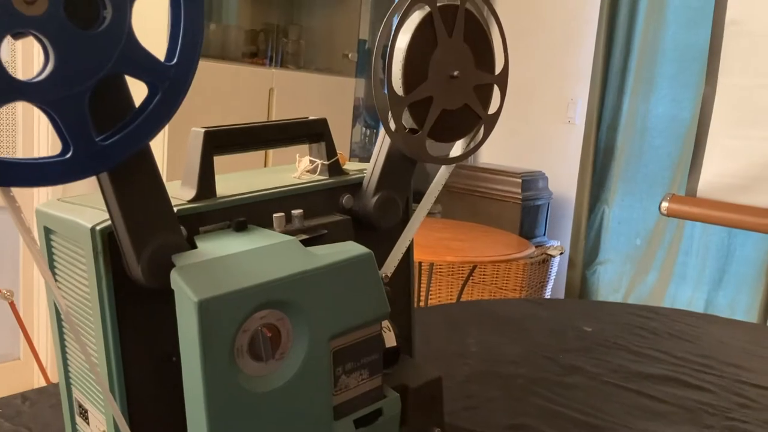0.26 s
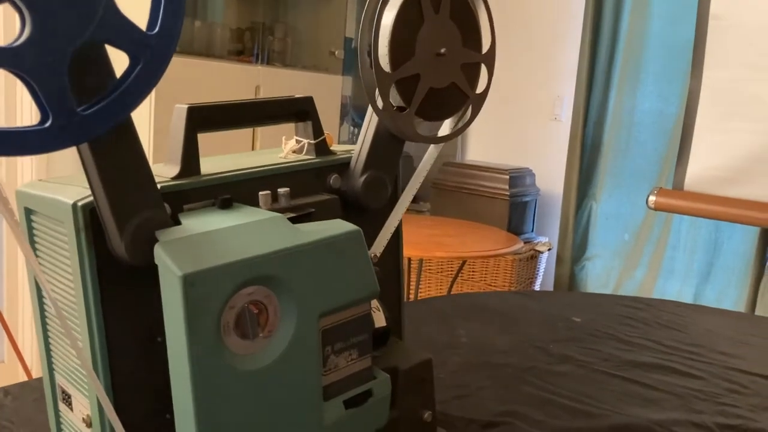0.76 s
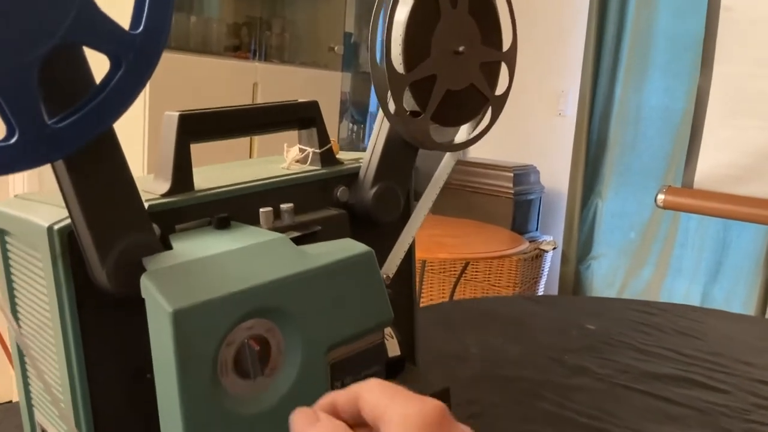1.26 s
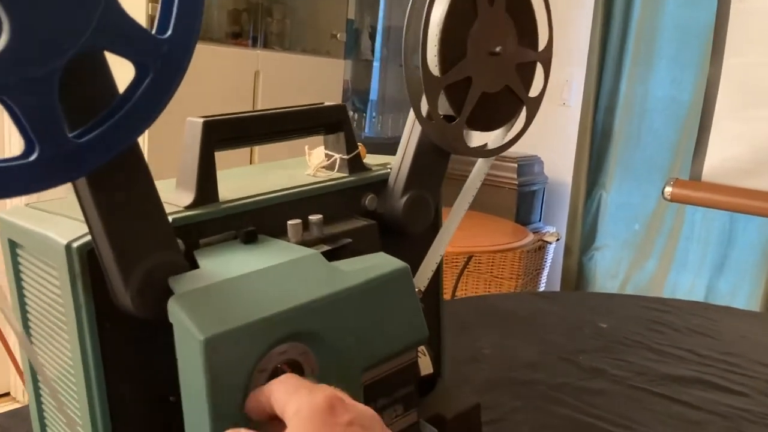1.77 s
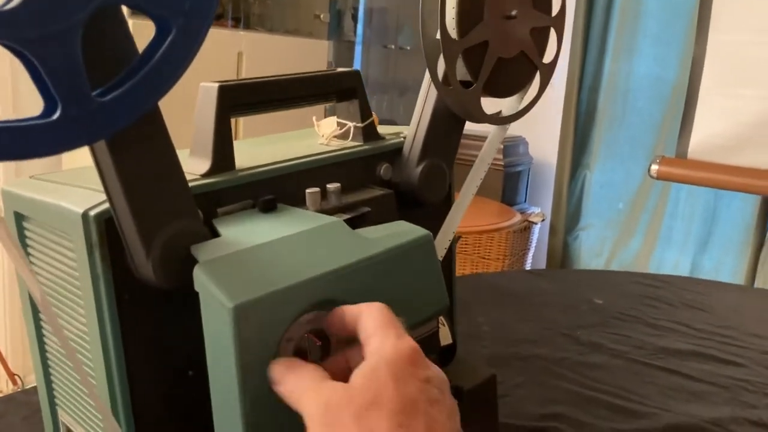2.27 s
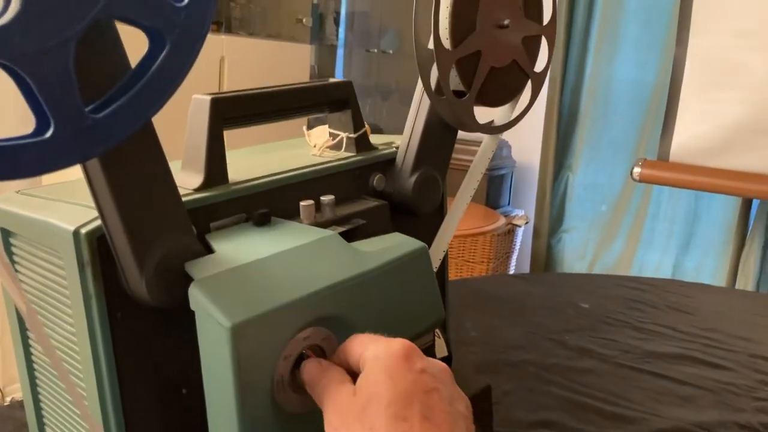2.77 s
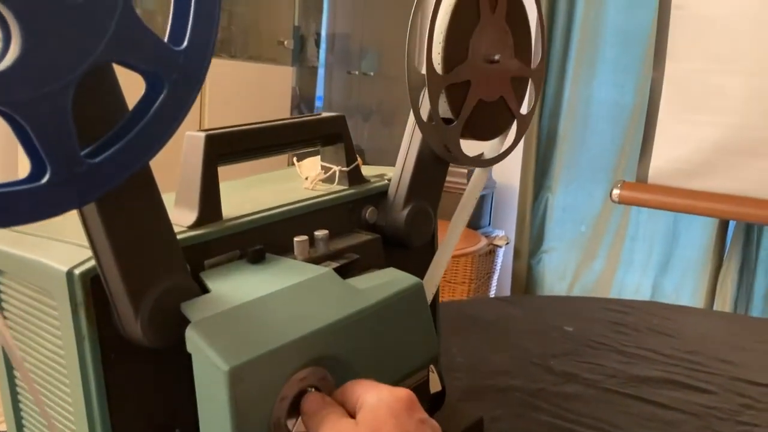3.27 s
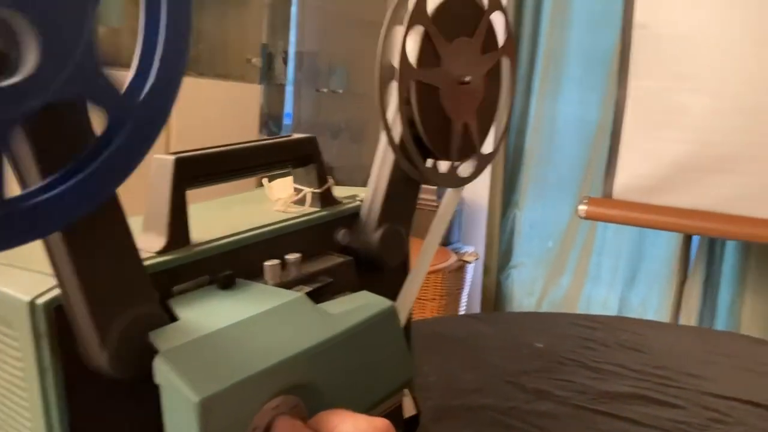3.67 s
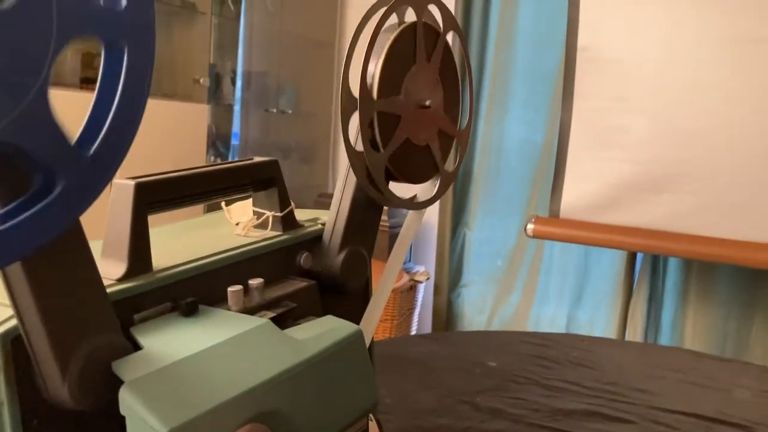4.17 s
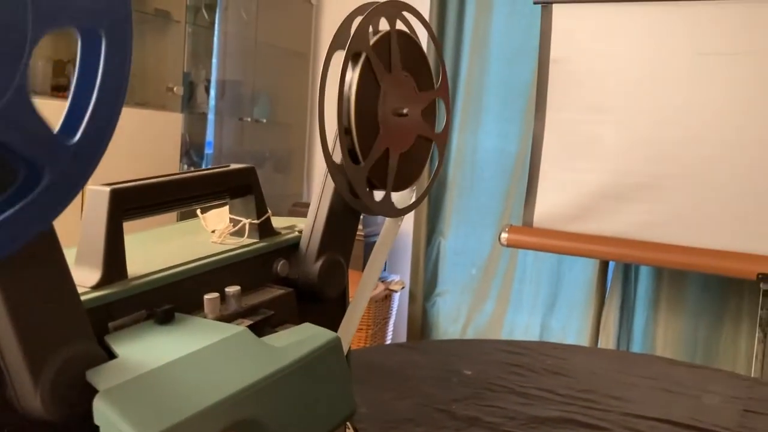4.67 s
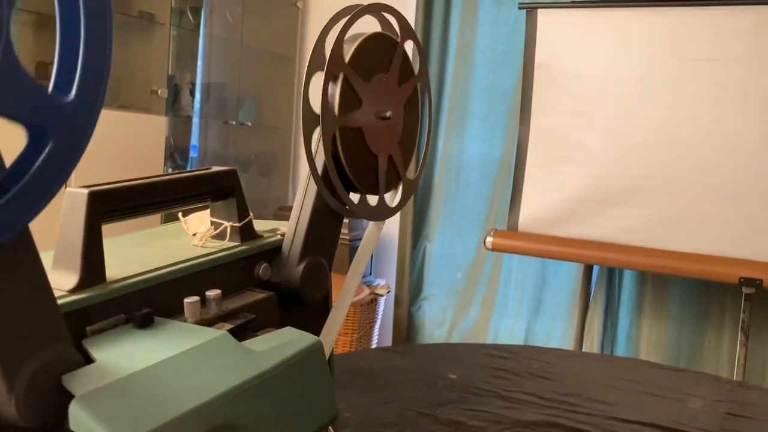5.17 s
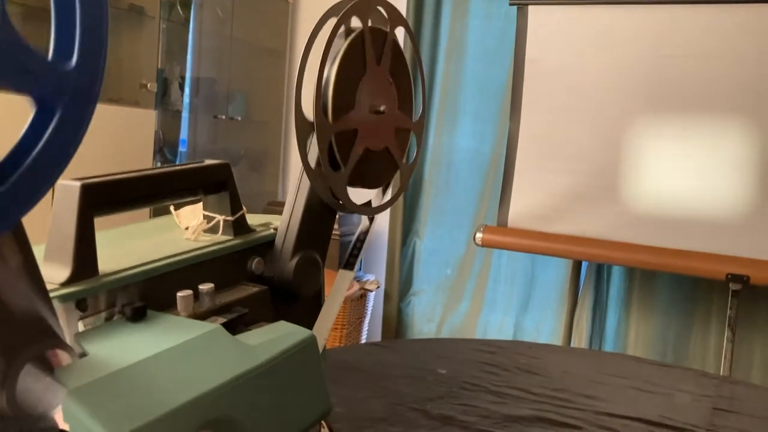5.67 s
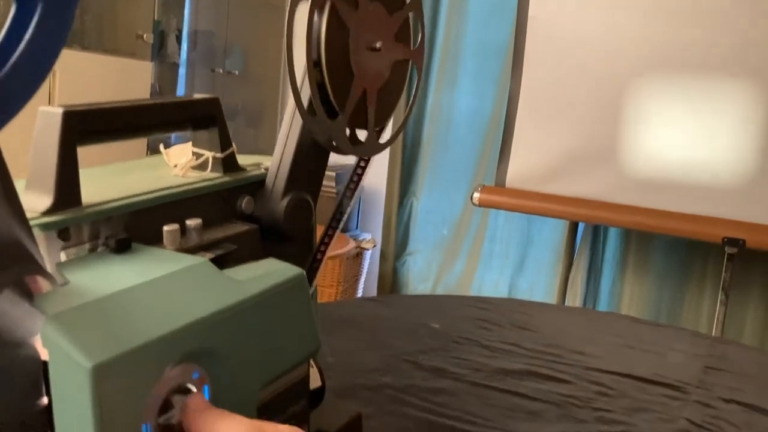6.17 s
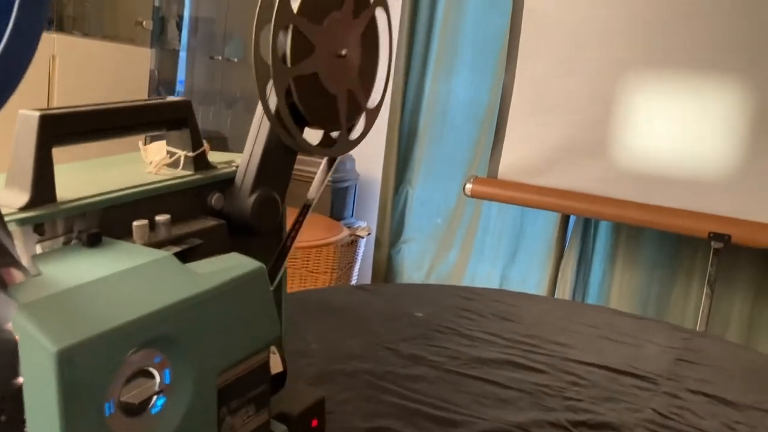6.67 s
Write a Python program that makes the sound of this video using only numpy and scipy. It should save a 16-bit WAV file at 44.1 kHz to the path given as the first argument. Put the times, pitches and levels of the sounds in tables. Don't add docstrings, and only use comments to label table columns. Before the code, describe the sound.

Soft fumbling and finger rubs on a dial, a hard clunk, a brief rising motor whine, then humming, clattering film projector with ticking film.

```python
import sys
import numpy as np
from scipy import signal
from scipy.fft import rfft, irfft, next_fast_len
from scipy.io import wavfile
from scipy.ndimage import map_coordinates

SR = 44100
rng = np.random.default_rng(int(sys.argv[2]) if len(sys.argv) > 2 else 0)


def gain_from_db(level_db):
    decades = np.asarray(level_db, float) / 20
    return 10 ** decades


def materialize(psi):
    bounded = np.clip(np.atleast_2d(psi).T, -1, 1)
    quanta = np.round(bounded * 32767).astype(np.int16)
    wavfile.write(sys.argv[1], SR, quanta)


N = 305607
T = np.arange(N) / SR
ON_S, SHUTTER_S = 3.08, 3.39
FRAMES = 89
FRAME_HZ = 23.4855


def unit(x):
    return x / np.sqrt(np.mean(x ** 2) + 1e-20)


def along(points, hz):
    f, v = np.transpose(points)
    return np.interp(np.log(hz + 1), np.log(f + 1), v)


def wobble(rate):
    coarse = T[::32]
    knots = rng.standard_normal(int(N * rate / SR) + 4)
    return np.interp(T, coarse, map_coordinates(knots, [coarse * rate]))


def filtered(x, response):
    m = next_fast_len(x.shape[-1] + 8192)
    spectrum = rfft(x, m) * response(np.fft.rfftfreq(m, 1 / SR))
    return irfft(spectrum, m)[..., :x.shape[-1]]


def ringing(x, modes):
    def response(f):
        total = 0
        for k, (c, w, db) in enumerate(modes):
            total = total + (-1) ** k * gain_from_db(db) * 1j * f * w / (c * c - f * f + 1j * f * w)
        return total
    return filtered(x, response)


def noise(spectrum, size=N):
    return unit(filtered(rng.standard_normal(size), lambda hz: gain_from_db(along(spectrum, hz))))


def decay(t60, attack, size):
    t = np.arange(size) / SR
    return gain_from_db(-60 * t / t60) * (1 - np.exp(-t / attack))


def swells(at, db, rise_db_per_s, hold, fall_db_per_s):
    coarse = T[::32]
    late = coarse[:, None] - at
    slope_db = np.minimum(rise_db_per_s * late, fall_db_per_s * (hold - late))
    return np.interp(T, coarse, gain_from_db(db + np.minimum(0, slope_db)).sum(1))


def place(out, s, x):
    out[round(s * SR):][:len(x)] += x


# pitch_hz, level_db_per_hz
AIR = [(59, -39), (100, -25), (190, -8.5), (1190, -23.5), (1410, -23.5), (4680, -31.5), (9270, -32),
       (11500, -31), (15500, -51), (16500, -49)]


def room_air():
    shared, left, right = noise(AIR), noise(AIR), noise(AIR)
    return gain_from_db(-79) * (0.83 * shared + 0.58 * np.array([left, right]))


# peak_s, low_level_db, upper_level_db
GRIP = [(0.01, -58, -84), (0.08, -71, -80), (0.32, -74, -95), (0.481, -67, -59.5), (1.14, -70, -73),
        (1.62, -79, -94), (1.97, -67, -61), (2.15, -73, -78), (2.43, -78, -56), (2.52, -81, -97),
        (2.62, -72, -104), (2.94, -76, -75)]


def handling():
    at, low_db, upper_db = np.transpose(GRIP)
    press_db_per_s, ease_db_per_s = 182, 130
    low = gain_from_db(-79) + swells(at, low_db, press_db_per_s, 0, ease_db_per_s)
    upper = gain_from_db(-75) + swells(at, upper_db, press_db_per_s, 0, ease_db_per_s)
    rumble = low * noise([(22, -24), (40, 12.0), (60, 3), (90, -46.0)])
    rumble = rumble + upper * noise([(50, -29.0), (80, 6.5), (160, -3.0), (300, -14.5), (600, -61.0)])
    return rumble + 0.042 * np.array([[1], [-1]]) * np.roll(rumble, 700)


# pitch_hz, level_db_per_hz
CRACK = [(300, -21), (1000, 8.5), (3500, -1.5), (8000, -11), (16000, -13.5)]


def dull_blows(events):
    out, n = np.zeros(N + SR), 16000
    for s, db, hz, bright_db, t60 in events:
        ring = unit(ringing(rng.standard_normal(n), [(hz, 0.3 * hz, 0), (1.54 * hz, .5 * hz, -5)]))
        crack = gain_from_db(bright_db) * noise(CRACK, n) * decay(0.77 * t60, 0.00046, n)
        place(out, s, gain_from_db(db - 3.0) * (ring * decay(t60, 0.0012, n) + crack))
    return out[:N]


# start_s, level_db, pitch_hz, brightness_db, t60_s
KNOCKS = [(0.359, -78, 511, 4, 0.15), (0.507, -68.5, 1960, -12, 0.07), (0.706, -66.5, 382, -1.5, 0.39),
          (0.971, -58.5, 310, -24, 0.28), (1.1253, -42, 540, 5, 0.3), (1.143, -32.5, 322, -5.5, 0.22),
          (1.416, -55.5, 325, -15, 0.2), (1.959, -75, 1100, -16, 0.15), (2.118, -49, 536, -26, 0.097),
          (2.14, -55, 400, -26, 0.51), (2.219, -51, 186, -21, 0.39), (2.363, -47.5, 800, -11, 0.19),
          (2.382, -41.5, 269, -13, 0.13), (2.585, -69.5, 258, 8.5, 0.06), (2.593, -59, 256, -25, 0.15),
          (2.699, -71.5, 420, 2, 0.21), (2.837, -50.5, 1040, -8, 0.083), (2.842, -60.5, 517, -20, 0.22),
          (2.921, -59, 204, -30, 0.12), (3.007, -60, 252, -18, 0.2)]


def knocks():
    return dull_blows(KNOCKS)


def sleeve():
    cloth = noise([(500, -6), (1200, -3), (2500, -4), (5000, -18), (9000, -29)])
    return swells(1.19, -61.5, 77, 0, 3000) * cloth


# start_s, level_db
STUTTER = [
    (1.128, -31.5),
    (1.1329, -33.5),
    (1.1428, -31),
    (1.148, -34),
    (1.16, -32.5),
    (1.179, -38),
]
# pitch_hz, width_hz, level_db
TABLE = [(312, 36, 4), (424, 48, -7), (535, 88, -7), (870, 70, -4.5), (1190, 250, -11), (1520, 120, -14),
         (2920, 160, -16), (3740, 140, -11.5)]


def judder():
    blows = np.zeros(N)
    for s, db in STUTTER:
        blows[round(s * SR)] = gain_from_db(db + 38.5)
    return ringing(blows, TABLE)


# peak_s, rise_db_per_s, hold_s, ring_level_db, hiss_level_db, rim_level_db
STROKES = [(1.767, 450, 0.067, -73, -85, -94), (1.84, 900, 0.035, -77, -90, -85),
           (1.895, 1598, 0.014, -62, -60.5, -71), (1.946, 500, 0.035, -68, -74, -76),
           (2.077, 900, 0.021, -66.5, -68, -87), (2.142, 600, 0.028, -67, -77, -87),
           (2.166, 252, 0.012, -58, -61, -63.5), (2.188, 900, 0.01, -60, -62, -68),
           (2.332, 700, 0.0078, -67, -92, -91), (2.366, 2500, 0.016, -55, -69, -79),
           (2.586, 2005, 0.0065, -74, -94, -72), (2.684, 150, 0.034, -87, -81, -80),
           (2.845, 1100, .01, -67, -88, -82), (3.03, 130, .005, -80, -97, -91)]
# pitch_hz, width_hz, level_db
DIAL = [(1116, 30, 11.5), (1222, 52, 11.5), (1950, 87, 6.5), (2090, 80, -16)]
# pitch_hz, width_hz, level_db
RIM = [(4210, 170, 2), (4960, 110, -2), (6250, 120, 1)]
# pitch_hz, level_db_per_hz
FILM = [(1500, 5), (2500, -19), (4000, 5.5), (5500, -4), (7000, -11), (8500, 10.5), (11500, 0), (12500, -1),
        (15800, -2)]


def dial():
    at, rise, hold, *levels = np.transpose(STROKES)
    ring, hiss, rim = (swells(at, db, rise, hold, 454) for db in levels)
    slips = gain_from_db(3.0 * wobble(130)) * rng.standard_normal(N)
    body = sum(gain_from_db(3.5 * wobble(35)) * ringing(slips, [mode]) for mode in DIAL)
    skin = unit(gain_from_db(2.9 * wobble(71)) * noise(FILM))
    return ring * unit(body) + rim * unit(ringing(slips, RIM)) + hiss * skin


# start_s, level_db, pitch_hz, upper_pitch_hz, upper_level_db, length_s
CHIRP = (1.894, -48.5, 1230, 1950, -14, .034)


def chirp():
    s, db, hz, upper_hz, upper_db, length = CHIRP
    t = T - s
    tones = np.sin(2 * np.pi * hz * t) + gain_from_db(upper_db) * np.sin(2 * np.pi * upper_hz * t)
    return gain_from_db(db) * np.sin(np.pi * np.clip(t / length, 0, 1)) * tones


# start_s, level_db, pitch_hz, brightness_db, t60_s
CLUNKS = [
    (3.063, -60, 395, 5.5, 0.34),
    (3.068, -47, 397, -2, 0.22),
    (3.08, -18, 260, -1.5, 0.16),
    (3.082, -29.5, 125, -35, 0.11),
    (3.082, -26.5, 395, -27, 0.051),
    (3.13, -31, 110, -28, 0.13),
    (3.159, -36, 240, -24.5, 0.1),
    (3.366, -30.5, 330, -29, 0.18),
]


def clunks():
    return dull_blows(CLUNKS)


# pitch_hz, width_hz, level_db
BRIGHT = [(6150, 710, 7), (6620, 1040, 14), (9300, 5300, 9.5), (11780, 250, 9), (16500, 920, -24)]
# pitch_hz, width_hz, level_db
BODY = [(1280, 440, 0), (2280, 280, -9)]
# pitch_hz, width_hz, level_db
LEVER = [(2700, 2200, 4), (3650, 50, 9), (4400, 950, 6.5)]


def metal_bursts(events):
    out, n = np.zeros(N + SR), 5000
    for s, db, body_db, lever_db, t60 in events:
        burst = decay(t60, 0.000059, n) * rng.standard_normal(n)
        push = decay(0.0014, 0.0001, n) + 0.094 * burst
        for blow, modes, share_db in ((burst, BRIGHT, 0), (push, BODY, body_db), (burst, LEVER, lever_db)):
            ring = ringing(blow, modes)
            place(out, s, gain_from_db(db + share_db) * ring / np.abs(ring).max())
    return out[:N]


# start_s, level_db, body_share_db, lever_share_db, t60_s
SNAPS = [
    (3.079, -15.5, -11, -14, 0.031),
    (3.159, -24.5, -2.5, -5, 0.027),
    (3.2235, -33, 15.5, 17, 0.033),
    (3.3596, -11.5, 0.5, -7, 0.033),
    (3.3631, -11.5, 3.5, -12, 0.039),
    (5.0727, -11.5, -4, -3, 0.044),
    (5.0793, -30, 11, -7, 0.063),
]


def snaps():
    return metal_bursts(SNAPS)


# time_s, offset_frames
SLIP = [(3.55, .011), (3.75, -.009), (3.95, -.016), (4.15, -.008), (4.35, -.035), (4.55, -.032),
        (4.75, -.015), (4.95, -.038), (5.15, -.028), (5.35, -.017), (5.55, -.037), (5.75, -.021),
        (5.95, -.003), (6.15, -.022), (6.35, -.009), (6.55, .009), (6.75, -.014)]


def motor():
    run_up_s, creep_hz_per_s, first_frame = .135, .0451, .201
    t = np.maximum(T - ON_S, 0)
    turn = first_frame + FRAME_HZ * run_up_s * np.log(np.cosh(t / run_up_s)) + creep_hz_per_s * t ** 2 / 2
    return np.tanh(t / run_up_s), turn + np.interp(T, *np.transpose(SLIP))


def engaged(s):
    return .5 + .5 * np.tanh((T - s) / 0.019)


def samples_at(turn, when):
    return np.minimum(np.searchsorted(turn, when), N - 1).ravel()


# turns_per_frame, level_db
SHUTTER = [(3, 3), (5, 5.5), (6, -13.5), (7, 1.5), (8, -1.5), (9, -7.5), (10, -17), (12, -16), (14, -3),
           (17, -2), (19, 1), (23, -12.5), (31, -10.5)]
# pitch_hz, level_db
ROTOR = [(223.5, -51), (279.4, -46.5), (308.5, -56.5)]


def hum(turn):
    mains_hz, mains_start_cycles, push_share = 120.0, .93, .01
    on = engaged(SHUTTER_S)
    mains = gain_from_db(-47.5) * np.sin(2 * np.pi * (mains_hz * T + mains_start_cycles))
    mains = mains * (0.92 + 0.67 * on) * (T > ON_S)
    blades, rotor = 0, 0
    for k, db in SHUTTER:
        level = gain_from_db(db + (.8 + .05 * k) * wobble(5))
        blades = blades + level * np.cos(2 * np.pi * k * (turn - push_share) + .015 * k * wobble(5))
    for hz, db in ROTOR:
        rotor = rotor + gain_from_db(db + 5.1 * wobble(3.6)) * np.sin(2 * np.pi * hz * T + .5 * wobble(4.3))
    return np.sqrt(2) * (gain_from_db(-44.5) * on * blades + mains + rotor * on)


# pitch_hz, level_db_per_hz
FAN = [(600, -37), (1200, -10), (2000, 3.5), (3000, -4), (4500, -1), (6500, -1.5), (8000, -21)]


def fan():
    level = gain_from_db(-52 + 1.85 * wobble(12)) * motor()[0] ** 3
    return level * np.array([noise(FAN), noise(FAN)]) * gain_from_db([[1.5], [-1.5]])


# pitch_hz, width_hz, level_db, change_after_swing_db
PARTS = [(519, 106, -12.5, -3), (727, 137, -11.5, -1.5), (1010.5, 125, -10, 2.5), (1448, 135, -17.5, -8),
         (1825, 260, -19, 3), (2640, 310, -23, -25)]
# part_index, share_of_frame, level_db
CAMS = [(0, .141, -4), (0, .445, -1), (0, .619, 0), (0, .923, -1), (1, .301, -4), (1, .333, 0),
        (1, .623, -4), (1, .849, -6), (1, .881, -8), (2, .227, -3.5), (2, .297, -7), (2, .39, 0),
        (2, .46, -2), (2, .507, -3), (2, .82, -7), (2, .89, -4), (2, .96, -3), (3, .315, 0), (3, .77, -6),
        (4, .295, 0), (4, .47, -7), (4, .78, -7), (5, .3, 0), (5, .335, -4), (5, .22, -7), (5, .9, -6)]


def cams(turn):
    play_frames, scatter_db = 0.0018, 2.0
    part, share, db = np.transpose(CAMS)
    luck, t, out = rng.standard_normal((FRAMES, 2, len(CAMS))), T[:1500], 0
    swung = np.clip((T - 6.17) / 0.2, 0, 1)
    for k, (hz, width, part_db, change_db) in enumerate(PARTS):
        mine = part == k
        peak_s = round(hz / (np.pi * width)) / hz
        when = 1 + np.arange(FRAMES)[:, None] + share[mine] - peak_s * FRAME_HZ
        spot = samples_at(turn, when + play_frames * luck[:, 0, mine])
        blows = np.bincount(spot, gain_from_db(db[mine] + scatter_db * luck[:, 1, mine]).ravel(), N)
        ring = t * np.exp(-np.pi * width * t) * np.cos(2 * np.pi * hz * t)
        out = out + gain_from_db(part_db + change_db * swung) * unit(signal.oaconvolve(blows, ring)[:N])
    return out


# share_of_frame, blow_level_db, scatter_db, scrape_level_db
STROKE = [(.12, -14, 2, -1), (.21, -12, 1.5, -5), (.27, -1, 1.2, 0), (.31, 0, 1.2, -1), (.36, -5, 1.5, -6),
          (.44, -8, 1.5, -7), (.55, -12, 1.5, -9), (.67, -14, 2, -11), (.76, -6, 1.5, -7),
          (.9, -9, 1.5, -8), (1.03, -15, 2, -12)]


def contacts(turn):
    share, blow_db, scatter_db, scrape_db = np.transpose(STROKE)
    luck = rng.standard_normal((FRAMES, 2, len(STROKE)))
    spot = samples_at(turn, 1 + np.arange(FRAMES)[:, None] + share + .004 * luck[:, 0])
    blows = np.bincount(spot, gain_from_db(blow_db + scatter_db * luck[:, 1]).ravel(), N)
    scrapes = np.bincount(spot, gain_from_db(scrape_db + scatter_db * luck[:, 1]).ravel(), N)
    return blows, scrapes


# time_s, level_db
DRAG = [
    (3.17, -10),
    (3.3, -2.5),
    (3.5, -2.5),
    (5.2, -0.5),
    (5.42, -6),
    (5.66, 0.5),
    (5.95, -5),
    (6.5, -0.5),
    (6.93, -1.5),
]


def drag():
    return np.interp(T, *np.transpose(DRAG))


# pitch_hz, width_hz, level_db
HOUSING = [(310, 128, -0.5), (474, 100, -1.5), (755, 123, -2), (1030, 108, -1.5), (1410, 68, -24),
           (1763, 120, -8.5), (2280, 79, -8), (2747, 78, -13), (4490, 62, -16.5), (7160, 340, -20)]
# pitch_hz, level_db_per_hz
GEARS = [(18, -36.5), (30, -28), (59, -7), (128, -5.5), (232, -2), (310, 4.5), (584, -8), (731, 0),
         (879, -22), (994, -3), (1270, -8), (1800, -11.5), (4000, -26.5), (5200, -31), (8800, -120)]


def gears(speed, turn, blows, drag_db):
    sag_db_per_s = 0.81
    level = gain_from_db(-31 - sag_db_per_s * (T - ON_S) + 0.1 * drag_db) * (0.27 + 0.71 * speed ** 5) * (T > ON_S)
    shaking = signal.fftconvolve(blows, decay(0.053, 0.00023, size=2000))[:N]
    rattle = unit(ringing(shaking * rng.standard_normal(N), HOUSING))
    whirr = noise(GEARS) * gain_from_db(0.37 * wobble(30))
    return level * (speed ** 2 * cams(turn) + gain_from_db(-9.0) * rattle + gain_from_db(-3.5) * whirr)


# time_s, pitch_hz, level_db
WHINE = [
    (3.09, 248.5, -35),
    (3.21, 246.6, -59),
    (3.225, 301, -69),
    (3.24, 305, -44),
    (3.34, 312, -40),
    (3.38, 340.7, -30),
    (3.45, 325, -43),
    (3.5, 330, -70),
]


def whine():
    s, hz, db = np.transpose(WHINE)
    phase = 2 * np.pi * np.cumsum(np.interp(T, s, hz)) / SR
    return np.sqrt(2) * gain_from_db(np.interp(T, s, db, -120, -120) + 2.0 * wobble(24.55)) * np.sin(phase)


def film_slide(scrapes, drag_db):
    pulled = signal.fftconvolve(scrapes, decay(0.017, 0.00052, size=4000))[:N]
    return gain_from_db(-48 + drag_db) * (T > 3.16) * unit(0.38 + pulled) * noise(FILM)


def projector():
    speed, turn = motor()
    blows, scrapes = contacts(turn)
    drag_db = drag()
    return hum(turn) + gears(speed, turn, blows, drag_db) + film_slide(scrapes, drag_db)


# start_s, level_db, case_and_lever_share_db
TICKS = [(3.174, -28, -13), (3.696, -44, 18), (3.783, -25, -7), (4.0477, -25, -8), (4.2577, -26, -9),
         (4.413, -43, 7), (4.7275, -26.5, -7), (5.005, -33.5, 2), (5.5993, -32, -3), (5.6845, -35, -18),
         (6.194, -31.5, -7), (6.2287, -39, -3), (6.3817, -32, -7), (6.426, -30, -2), (6.8225, -33.5, 4)]


def ticks():
    return metal_bursts([(s, db, dull_db, dull_db, 0.037) for s, db, dull_db in TICKS])


def table_rumble():
    return gain_from_db(-54.5) * (T > SHUTTER_S) * noise([(28, -30), (45, 3.0), (56, -4), (64, -20)])


# start_s, level_db, pitch_hz
THUDS = [(3.413, -16, 1043), (3.476, -17, 1060), (3.518, -19, 1020), (3.561, -22, 982), (3.603, -19, 664),
         (3.646, -17.5, 966), (3.689, -29, 730), (3.73, -20, 729), (3.816, -33, 727), (3.986, -27, 732),
         (4.071, -23, 730), (4.157, -30, 996), (4.241, -24, 994), (4.285, -13, 740), (4.327, -21, 724),
         (4.455, -20, 740), (4.522, -23, 1030), (4.61, -26, 1070), (4.623, -25, 710), (4.652, -18, 1057),
         (4.752, -23, 1040), (4.837, -9.5, 720), (4.88, -19, 719), (5.006, -21, 727), (5.049, -29, 746),
         (5.175, -21, 760), (5.202, -31, 1010), (5.216, -20, 920), (5.244, -37, 970), (5.259, -29, 1020),
         (5.386, -20, 991), (5.429, -17, 764), (5.515, -14.5, 720), (5.556, -23, 675), (5.6, -32, 720),
         (5.647, -37, 1070), (5.727, -31, 724), (5.768, -16, 790), (5.806, -19, 970), (5.851, -20, 950),
         (5.895, -35, 727), (5.979, -21, 735), (6.022, -14, 714), (6.065, -17.5, 750), (6.192, -23, 970),
         (6.234, -10, 1016), (6.276, -15, 993), (6.359, -16, 960), (6.529, -30, 1010), (6.566, -18, 980),
         (6.615, -15, 985), (6.655, -20, 1010)]


def thuds():
    out, t = np.zeros(N + SR), T[:3000]
    for s, db, hz in THUDS:
        place(out, s, gain_from_db(db - 8) * decay(0.05, .0009, len(t)) * np.sin(2 * np.pi * hz * t))
    return out[:N]


# start_s, level_db
HARD = [(3.4316, -16), (3.472, -20), (3.559, -26), (3.646, -28), (3.7309, -35), (3.775, -25), (3.8164, -38),
        (3.8592, -22), (3.8995, -26), (3.9432, -17.5), (3.986, -32), (4.029, -17.5), (4.07, -25),
        (4.1561, -31), (4.242, -37), (4.2848, -32), (4.3273, -25), (4.3703, -28), (4.41, -25),
        (4.4962, -19), (4.5392, -20), (4.58, -23.5), (4.6238, -22.5), (4.666, -19), (4.728, -31),
        (4.792, -21), (4.8367, -40), (4.9207, -25), (4.962, -28), (5.006, -25.5), (5.078, -19),
        (5.1324, -20.5), (5.1752, -18.5), (5.2152, -21), (5.2594, -19), (5.4289, -26.5), (5.4696, -24),
        (5.514, -17.5), (5.5555, -38), (5.6, -38), (5.682, -41), (5.7269, -19), (5.768, -18),
        (5.809, -23.5), (5.8523, -26), (5.894, -42), (5.979, -25), (6.0216, -22.5), (6.0646, -21),
        (6.192, -44), (6.275, -20.5), (6.321, -27), (6.4438, -21), (6.6557, -35), (6.7843, -36),
        (6.826, -23), (6.8704, -32), (6.9112, -23)]
# pitch_hz, width_hz, level_db
CLAW = [(800, 120, -18), (1130, 130, 3.5), (1440, 120, 12.5), (1870, 910, 3.5), (2400, 1060, -2)]


def hard_strokes():
    out, n = np.zeros(N + SR), 2000
    for s, db in HARD:
        blow = ringing(decay(0.017, 0.00087, n) * rng.standard_normal(n), [(1590, 6300, 0)])
        ring = ringing(blow, [(hz, w, level + rng.normal(0, 5.4)) for hz, w, level in CLAW])
        place(out, s - .002, gain_from_db(db - 4.4) * ring / np.abs(ring).max())
    return out[:N]


# start_s, level_db, pitch_hz, length_s
SQUEAKS = [
    (3.628, -50, 3340, 0.032),
    (3.692, -45, 3370, 0.03),
    (5.718, -54, 3630, 0.027),
    (5.738, -49, 3570, 0.023),
    (5.753, -50, 3530, 0.016),
    (6.449, -50, 3320, 0.016),
    (6.46, -52, 3700, 0.02),
    (6.488, -49, 3530, 0.042),
]


def squeaks():
    out = np.zeros(N)
    for s, db, hz, length in SQUEAKS:
        n = int(length * SR)
        rough = ringing(rng.standard_normal(n), [(0.99 * hz, 130, 0), (0.97 * hz, 160, -9)])
        place(out, s, gain_from_db(db + 8.5) * np.hanning(n) * unit(ringing(rough, [(hz, 900, 0)])))
    return out


# pitch_hz, t60_s
ROOM = [(150, 0.52), (1500, 0.3), (4000, 0.25), (10000, 0.22)]


def room(x):
    hz, t, z = signal.stft(rng.standard_normal((2, SR // 2)), SR, nperseg=256)
    tail = signal.istft(z * gain_from_db(-60 * t / along(ROOM, hz)[:, None]), SR, nperseg=256)[1]
    late = np.pad(x, (200, 0))[None]
    return signal.fftconvolve(late, tail / np.linalg.norm(tail[0]), axes=1)[:, :N]


# pitch_hz, phase_rad
LEAD = [(0, 0.064), (700, 0.66), (1380, 1.17), (2000, 2.65), (2800, 1.65), (4000, 1.72)]
# pitch_hz, difference_db
LEFT = [(60, 0), (200, -1), (380, .5), (700, 3), (1290, 7), (2380, 6), (4400, 1), (8000, 0)]


def ports(x):
    side = np.array([[.5], [-.5]])

    def response(hz):
        return gain_from_db(side * along(LEFT, hz)) * np.exp(1j * side * np.interp(hz, *np.transpose(LEAD)))
    return filtered(x, response)


def scene():
    near = knocks() + sleeve() + dial() + chirp() + judder() + clunks() + snaps() + projector() + whine()
    near = near + ticks() + thuds() + hard_strokes() + squeaks()
    colour = [(60, -57), (170, -10.5), (300, -13.5), (800, -7.5), (1500, -5.5), (3000, -4.5), (6000, -13.0),
              (12000, -10.5)]
    reverberation = filtered(room(near), lambda hz: gain_from_db(along(colour, hz)))
    return ports(near) + reverberation + fan() + room_air() + handling() + table_rumble()


def scattered(x):
    z = signal.stft(x, nperseg=128)[2]
    y = signal.istft(z * np.exp(2j * np.pi * rng.random(z.shape)), nperseg=128)[1][..., :N]
    return y * np.std(x) / np.std(y)


# pitch_hz, share
SCATTER = [(300, .01), (800, 0.046), (1500, 0.15), (2200, 0.33), (5500, .55)]


def loose_share(hz):
    return np.clip(along(SCATTER, hz), 0, 1) * (hz > 150)


def roll_off(x):
    return signal.sosfilt(signal.butter(12, 16820, fs=SR, output="sos"), x)


def record(dry):
    side = np.array([[.5], [-.5]])

    def treble(hz):
        return np.clip((hz - 6400) / 500 + .5, 0, 1)

    def lag(hz):
        turn = 2 * np.pi * (hz - 6850) / 4560
        linger = np.clip(hz / 25000, .38, .5) * np.sin(2 * turn)
        return np.exp(-1j * side * (turn - linger))

    def blend(hz):
        return (1 - treble(hz)) * np.sqrt([[1 - loose_share(hz)], [loose_share(hz)]])

    loose = scattered(dry)
    heard = filtered(np.array([dry, loose]), blend).sum(0)
    heard = heard + filtered(dry[0], lambda hz: treble(hz) * lag(hz))
    heard = heard + 2 * side * gain_from_db(-15) * filtered(loose[0], treble)
    top = [(15800, 0), (15960, -24), (16900, -40), (17500, -80)]
    return roll_off(filtered(heard, lambda hz: gain_from_db(along(top, hz))))


dry = scene()
out = record(dry)
materialize(out)
```